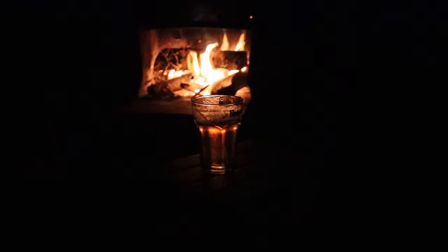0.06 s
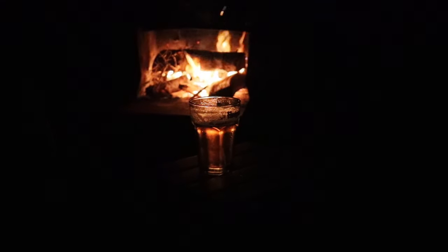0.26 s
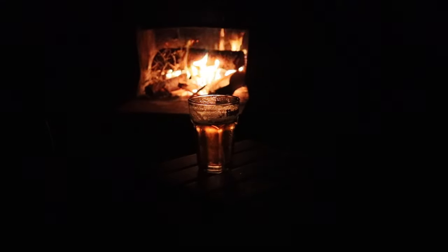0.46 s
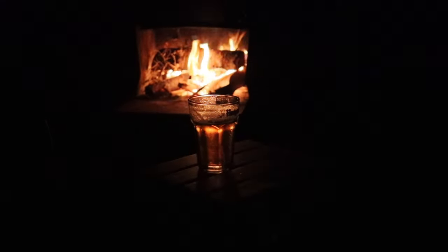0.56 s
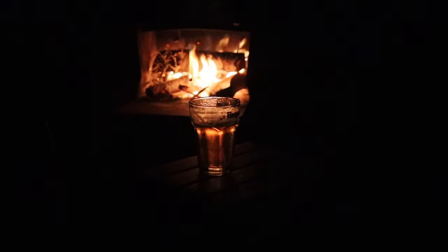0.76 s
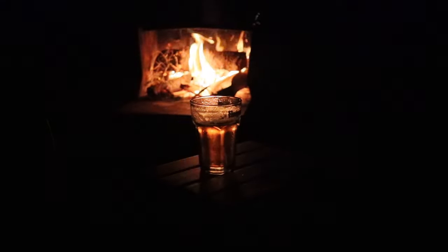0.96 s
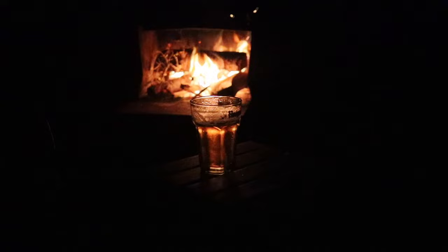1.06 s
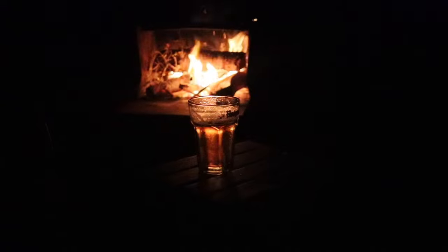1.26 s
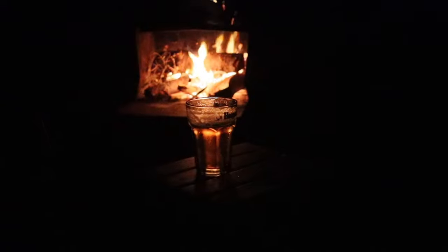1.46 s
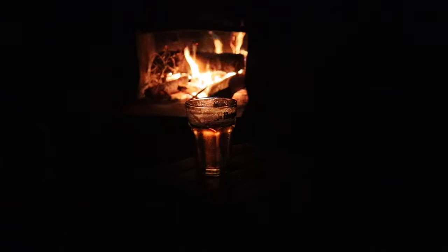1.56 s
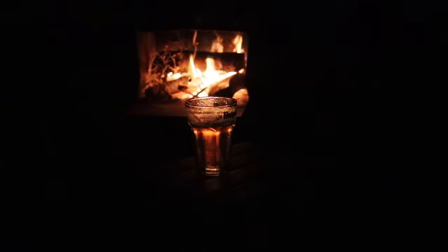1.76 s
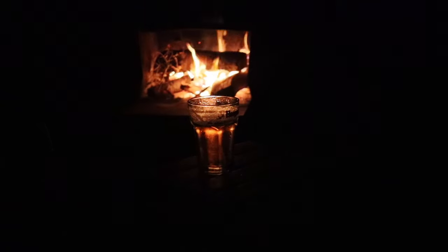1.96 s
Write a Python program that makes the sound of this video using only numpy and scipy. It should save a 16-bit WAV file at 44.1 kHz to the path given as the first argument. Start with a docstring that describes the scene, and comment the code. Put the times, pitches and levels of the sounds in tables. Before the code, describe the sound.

A wood fire crackles in an outdoor stove with sharp, irregular pops and snaps.

```python
"""Wood fire in an outdoor stove

Gas pockets burst in the logs: each pop is a sharp crack that scatters in the firebox and echoes
faintly from the yard. One pop sets the stove's metal ringing. Dull log knocks, ember ticks,
a soft flame rumble and a thin hiss fill the gaps."""
import sys
import numpy as np
from scipy import signal
from scipy.fft import rfft, irfft
from scipy.io import wavfile
from scipy.ndimage import uniform_filter1d

SR = 44100
rng = np.random.default_rng(int(sys.argv[2]) if len(sys.argv) > 2 else 0)


def dump(signal):
    """Clip the signal to [-1, 1] and save it as 16-bit WAV at the path in sys.argv[1]."""
    limited = np.clip(np.atleast_2d(signal).T, -1, 1)
    pcm = np.round(limited * 32767).astype(np.int16)
    wavfile.write(sys.argv[1], SR, pcm)


N = 88200
CRACK_SAMPLES = 2048
BINS_HZ = np.fft.rfftfreq(CRACK_SAMPLES, 1 / SR)

BAND_HZ = [300, 3000, 8000, 14000]  # bass, mid, treble, top
THUMP_HZ, THUMP_WIDTH_HZ, SPLINTER_Q = 766, 283, 6.1
# Colour common to all pops (frequency [Hz], gain [dB])
FIREBOX_COLOUR = [(30, -29), (120, -11.5), (250, 0), (380, 2.5), (560, -3.5), (1000, 0.5), (1430, -6.5),
                  (1950, 5), (2550, -3), (3200, -1), (4200, 2), (6300, -3), (8700, 1), (10500, -4),
                  (15000, -3), (16500, -26)]
# Gas bursts (time [s], bass [dB], thump [dB], mid [dB], treble [dB], top [dB],
# splinter pitch [Hz], splinter lift [dB], scatter [dB re first click])
GAS_POPS = [ (0.0751, -21.5, -6.5, -14.5, -14.5, -17.5, 3040, 5, 6),
            (0.2264, 10.5, 17.5, 11.5, 10.5, 6, 13900, 8, 5.5),
            (0.238, -9, 10, -2.5, -11, -12, 4300, 3, -9.5),
            (.3120, -25, -9.5, -32, -23.5, -23, 7500, 0, 16),
            (0.4056, -25, -22, -30.5, -28, -26, 5000, -9, 12),
            (0.4824, -19, -16, -35, -42, -27, 12800, 3, -3),
            (0.5868, -14, -3, -19.5, -36, -31, 9000, 16, -6),
            (0.5951, -7.5, -15, -18, -20, -21, 5570, 6.5, 11),
            (.6120, -28, -28, -28, -27, -36, 8000, 3, -8), (.7834, -29, -38, -35, -25, -18.5, 7700, 7.5, 5),
            (0.8414, -14, -18, -23, -42, -42, 2006, 0, 7), (.9130, -7.5, -2, 0.5, 1, -10, 5300, 3.5, -5),
            (0.9193, 5, -16, 0.5, -25, -13, 8260, 24.5, 6),
            (1.0135, -34, -23, -29.5, -25.5, -30, 8900, 6.5, 2),
            (1.0698, -29, -12, -20.5, -32, -20, 2200, 4, -8), (1.084, -11, -3, -28, -32, -33, 4540, 5, 0),
            (1.0891, -36, -11, -23.5, -23, -20, 8500, 6.5, 12),
            (1.1080, -12, -2.5, -26.5, -28, -30, 3000, 3, -5),
            (1.1618, -22, 2, -15.5, -14, -17.5, 4950, 3, -3),
            (1.1906, -28, -32, -33, -28, -33, 8500, 1, -4),
            (1.2198, -16.5, -14.5, 4, -1.5, 0, 8400, 12, -0.5),
            (1.3214, -19, -28, -21.5, -36.5, -25, 8660, 17, 7),
            (1.3661, -6, 9.5, 3.5, 0.5, -3.5, 3210, 7.5, 26),
            (1.428, -36, -23, -17, -15.5, -12.5, 9800, 10.5, 1),
            (1.5000, -25, -13.5, -39, -28, -34, 4500, 12.5, 4),
            (1.6130, -38, -28, -23, -25, -20, 9900, -1, 4),
            (1.669, -30, -20, -29.5, -37, -38, 1340, 24.5, 1),
            (1.7070, -25, -15, -19.5, -10, -15, 12000, 11.5, -2),
            (1.7394, -24, -27, -12.5, -12, -12.5, 5150, 11, -3.5),
            (1.7698, -19.5, -16, -23, -41, -36, 1375, 20.5, -11),
            (1.7880, -22, -15, -19, -23, -28, 4630, 4, 4), (1.8158, -23, -18, -25, -36, -34, 1340, 18, 6),
            (1.8850, -38, -33, -30, -30, -25, 6000, 1, 1), (1.9350, -39, -22, -25, -32, -32, 4000, 4, 5),
            (1.9668, -25, -14.5, -31, -24, -36, 7000, -1, 8),
            (1.9873, -18, -19, -27, -16.5, -29, 9000, -4, 5), ]


def pops():
    """Gas bursts ring a splinter and thump the firebox air. Returns direct sound and yard feed."""
    direct, to_yard = np.zeros((2, N))
    for start_s, bass, thump_db, mid, treble, top, splinter_hz, lift_db, scatter_db in GAS_POPS:
        bands = list(zip(BAND_HZ, (bass, mid, treble, top)))
        wood = amp(curve(bands, BINS_HZ) + curve(FIREBOX_COLOUR, BINS_HZ))
        splinter = 1 + (amp(lift_db) - 1) * resonance(splinter_hz, splinter_hz / SPLINTER_Q) ** 2
        thump = amp(thump_db) * resonance(THUMP_HZ, THUMP_WIDTH_HZ) * resonance(THUMP_HZ, THUMP_HZ)
        add(direct, start_s, crack(np.hypot(wood * splinter, thump), scatter_db))
        add(to_yard, start_s, irfft(minimum_phase(np.hypot(wood, thump))))
    return direct, to_yard


def crack(gain, scatter_db, rise_s=0.00053, decay_s=0.0012):
    """A click and its dense reflections among the logs, flattened, then coloured by gain."""
    t = np.arange(CRACK_SAMPLES) / SR
    click = t == 0
    scatter = rng.standard_normal(len(t)) * np.exp(-t / decay_s) * (1 - np.exp(-t / rise_s))
    spectrum = rfft(amp(scatter_db) * scatter / np.linalg.norm(scatter) - click)
    broad_shape = np.sqrt(uniform_filter1d(abs(spectrum) ** 2, size=31))
    return irfft(spectrum * minimum_phase(gain / broad_shape))


ROUGHNESS, BEAT_HZ = 0.71, 45.4  # both at 1 kHz
# Stove wall modes (frequency [Hz], level [dB], T60 [s])
WALL_MODES = [(618, -50.5, 0.72), (653, -50.5, 0.97), (720, -55, 0.42), (745, -48.5, 0.43), (882, -52, .8),
              (935, -44, 0.21), (996, -50, 0.53), (1630, -40, 0.12), (1690, -47.5, 0.23),
              (2030, -38, 0.095), (2123, -38.5, .13), (2370, -55, 0.067), (2320, -56, 0.17),
              (2800, -49.5, 0.23)]
# Pops against the wall (time [s], gain [dB])
WALL_HITS = [(1.3668, 0)]


def stove_ring(attack_s=0.0012):
    """A pop rings the metal wall. Higher modes crowd together, so they beat faster and deeper."""
    out, t = np.zeros(N), np.arange(SR) / SR
    attack = np.minimum(t / attack_s, 1)
    for start_s, hit_db in WALL_HITS:
        for hz, level_db, t60_s in WALL_MODES:
            crowding = (hz / 1000) ** 2.3
            rough = np.clip(ROUGHNESS * crowding, 0, 1)
            low_pass = signal.butter(2, BEAT_HZ * crowding, fs=SR, output="sos")
            slow_noise = signal.sosfilt(low_pass, rng.standard_normal((2, 2 * SR)))[:, SR:]
            real, imag = unit_rms(slow_noise) / np.sqrt(2)
            beating = np.sqrt(1 - rough ** 2) + rough * (real + 1j * imag)
            mode = (beating * np.exp(2j * np.pi * (hz * t + rng.random()))).real
            add(out, start_s, amp(hit_db + level_db - 60 * t / t60_s) * mode * attack)
    return out


# Log jolts (time [s], level [dB])
LOG_JOLTS = [(0.2267, -34.5), (.9200, -37.5), (1.1613, -35), (1.3850, -35.5), (1.491, -36), (1.7391, -35.5)]


def log_knocks(pitch_hz=265.7, decay_s=0.0046):
    """A jolted log answers with a short low note."""
    out, t = np.zeros(N), np.arange(0, 10 * decay_s, 1 / SR)
    envelope = np.minimum(t * pitch_hz, 1) * np.exp(-t / decay_s)
    note = np.sin(2 * np.pi * pitch_hz * t) * envelope
    for start_s, level_db in LOG_JOLTS:
        add(out, start_s, amp(level_db) * note)
    return out


def ember_ticks(rate_per_s=68, floor_db=-42, spread_db=3.5):
    """Embers tick at random, each at its own pitch; loud ticks are rare."""
    out = np.zeros(N)
    pitches_hz = np.geomspace(2000, 12000, 64)
    for when, softness, pitch in rng.random((int(rate_per_s * N / SR), 3)):
        hz = pitches_hz[int(pitch * len(pitches_hz))]
        level_db = floor_db - spread_db * np.log(max(softness, 0.03))
        add(out, when * N / SR, crack(amp(level_db) * resonance(hz, hz), scatter_db=-1))
    return out


# Yard decay (frequency [Hz], T60 [s])
ECHO_DECAY = [(200, 0.23), (1000, 0.61), (4000, 0.33), (9000, 0.44), (15000, 0.23)]
# Echo colour (frequency [Hz], relative gain [dB])
ECHO_COLOUR = [(200, 12), (900, -2), (1800, -0.5), (4000, -1.5), (8500, 3), (14000, -1.5)]


def yard_echo(sound, gain_db=-22, delay_s=0.005):
    """The surroundings return a faint diffuse echo, longest near 1 kHz."""
    hz, t, noise = signal.stft(rng.standard_normal(SR), SR, nperseg=256)
    envelope_db = curve(ECHO_COLOUR, hz)[:, None] - 60 * t / curve(ECHO_DECAY, hz)[:, None]
    tail = signal.istft(noise * amp(envelope_db), SR)[1]
    out = np.zeros(N)
    add(out, delay_s, signal.fftconvolve(sound, tail / np.linalg.norm(tail)))
    return amp(gain_db) * out


FLUTTER_DB, HISS_FLICKER_DB, HISS_EDGE_HZ = 1.65, 0.5, 15900
RUMBLE_SIDE_DB, SIDE_CORNER_HZ, HISS_SIDE_DB = -25, 300, -40.5
# Rumble and hiss (frequency [Hz], relative density [dB])
FLAME_SPECTRUM = [(12, -29), (20, 1.5), (176, -7), (227, -5.5), (693, -17), (843, -11.5), (916, -13),
                  (1320, -17.5), (1790, -20.5), (2180, -22.5), (2570, -22.5), (4140, -24.5), (4500, -25),
                  (8790, -23), (10700, -27.5), (14100, -25.5), (15800, -31.5)]


def flames(rms_db=-54):
    """Flames flutter in the bass under a smoother hiss; the rumble is slightly wider in stereo."""
    hz = np.fft.rfftfreq(1024, 1 / SR)
    frames = N // 256 + 5
    mid_re, mid_im, side_re, side_im, flicker = rng.standard_normal((5, frames, len(hz)))
    flicker = uniform_filter1d(flicker, size=6, axis=0)
    flicker = unit_rms(uniform_filter1d(flicker, size=10, axis=1))
    depth_db = curve([(400, FLUTTER_DB), (2500, HISS_FLICKER_DB)], hz)
    gain = amp(curve(FLAME_SPECTRUM, hz) + depth_db * flicker) * (hz < HISS_EDGE_HZ)
    width = amp(RUMBLE_SIDE_DB) / np.hypot(1, hz / SIDE_CORNER_HZ) + amp(HISS_SIDE_DB)
    spectra = np.array([mid_re + 1j * mid_im, (side_re + 1j * side_im) * width]) * gain
    mid, side = signal.istft(spectra.transpose(0, 2, 1), nperseg=1024, noverlap=768)[1][:, :N]
    return amp(rms_db) * unit_rms(np.array([mid + side, mid - side]))


def amp(db):
    return 10 ** (np.asarray(db) / 20)


def unit_rms(x):
    return x / np.sqrt(np.mean(x ** 2) + 1e-20)


def curve(points, hz):
    """Interpolates (frequency [Hz], value) points on a log-frequency axis."""
    points_hz, values = np.transpose(points)
    return np.interp(np.log(hz + 1), np.log(points_hz + 1), values)


def add(mix, start_s, sound):
    part = mix[max(round(start_s * SR), 0):][:len(sound)]
    part += sound[:len(part)]


def resonance(centre_hz, width_hz):
    """Band-pass gain over BINS_HZ, 1 at the centre."""
    return 1 / np.sqrt(1 + ((BINS_HZ ** 2 - centre_hz ** 2) / (BINS_HZ * width_hz + 1)) ** 2)


def minimum_phase(gain):
    """Spectrum of the quickest click with this gain."""
    log_gain = np.log(np.maximum(gain, 1e-5))
    mirrored = np.concatenate([log_gain, log_gain[-2:0:-1]])
    return np.exp(np.conj(signal.hilbert(mirrored)))[:len(gain)]


def scene():
    """The fire, straight ahead."""
    direct, to_yard = pops()
    return direct + yard_echo(to_yard) + log_knocks() + ember_ticks() + stove_ring() + flames()


def record(dry, cutoff_hz=16800):
    """Soft limiter at full scale, then a low-pass."""
    limited = dry / (1 + dry ** 8) ** (1 / 8)
    low_pass = signal.firwin(255, cutoff_hz, window=("kaiser", 9), fs=SR)
    return signal.oaconvolve(limited, low_pass[None], "same")


dry = scene()
out = record(dry)
dump(out)
```